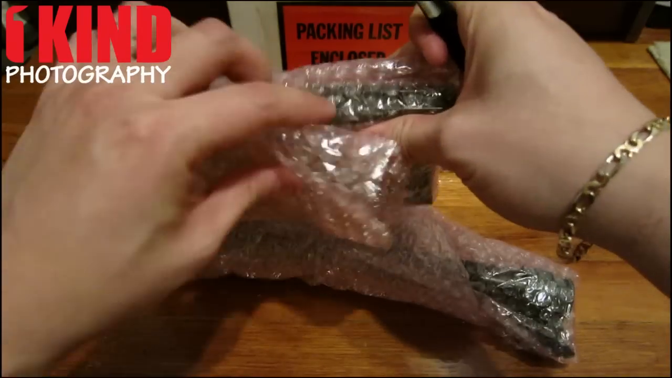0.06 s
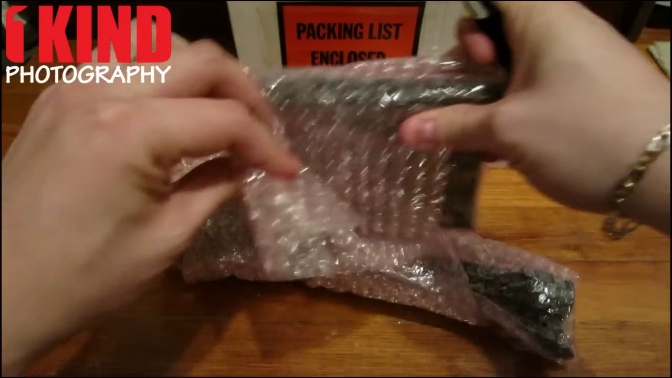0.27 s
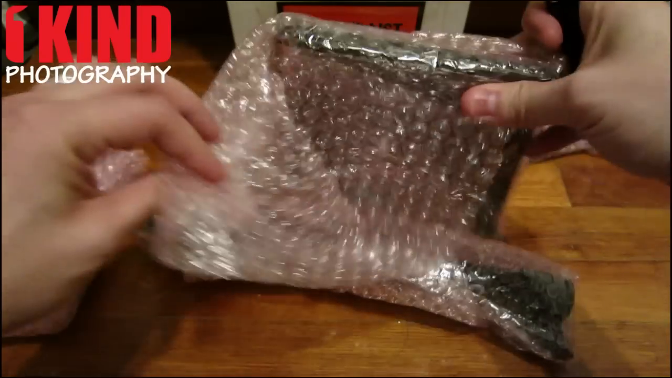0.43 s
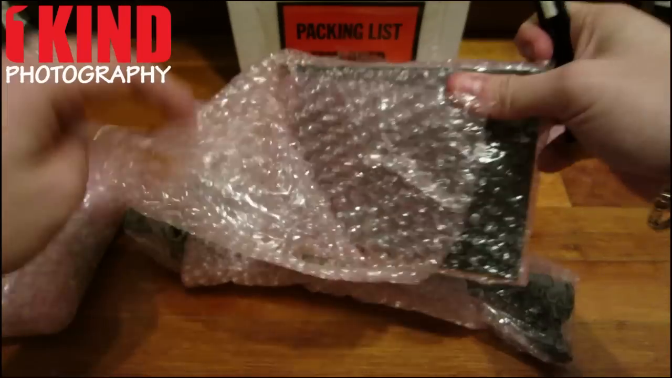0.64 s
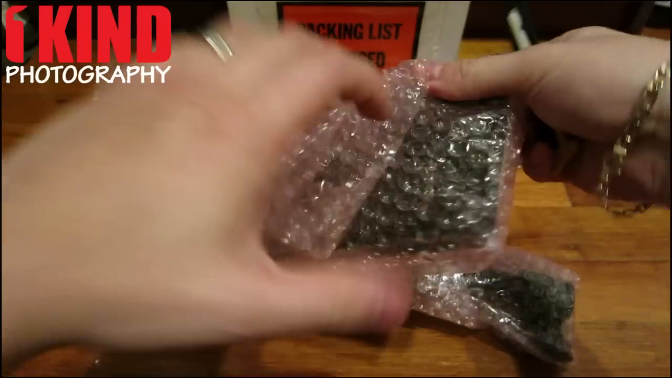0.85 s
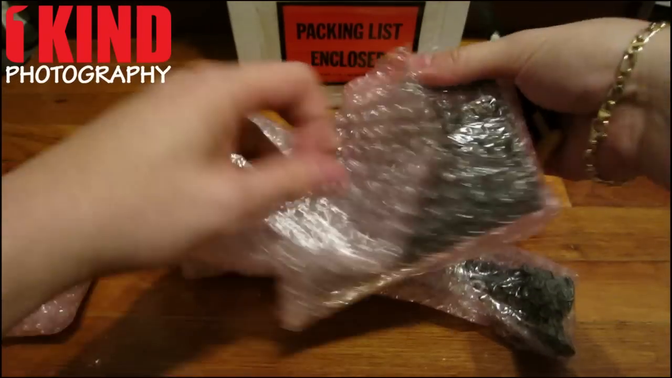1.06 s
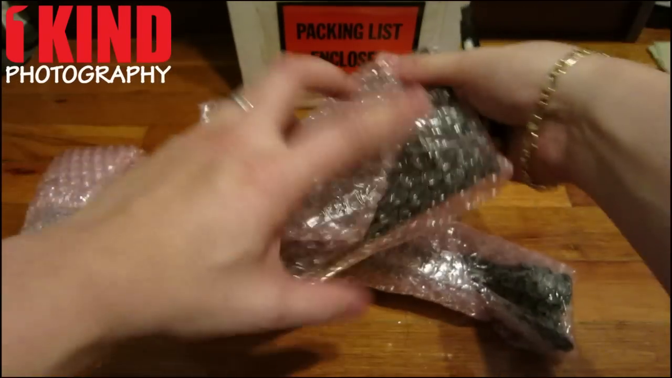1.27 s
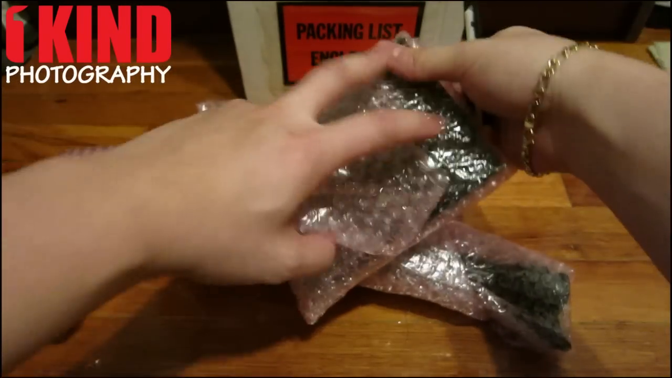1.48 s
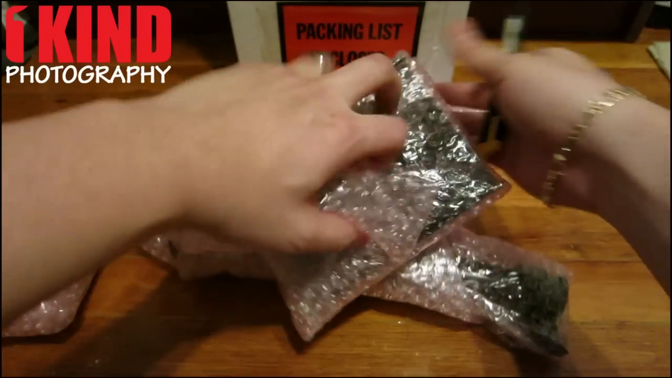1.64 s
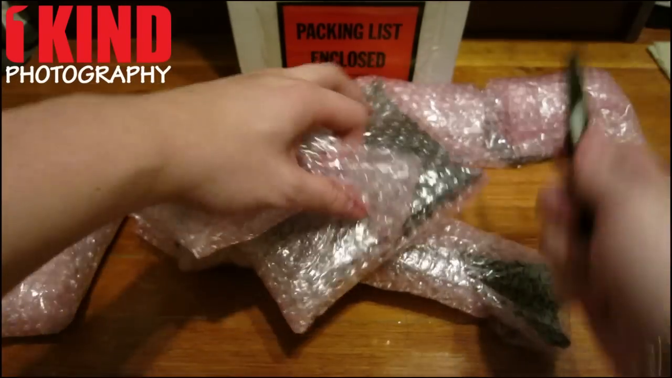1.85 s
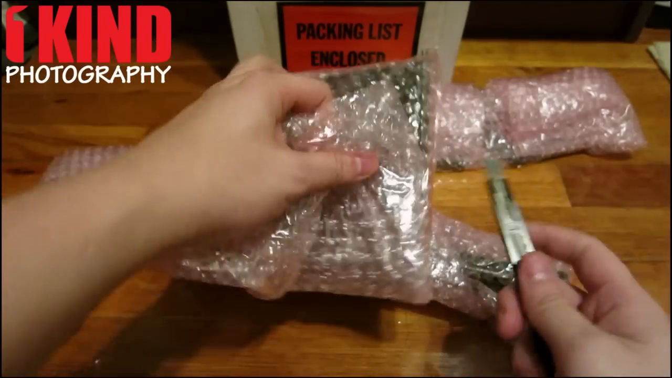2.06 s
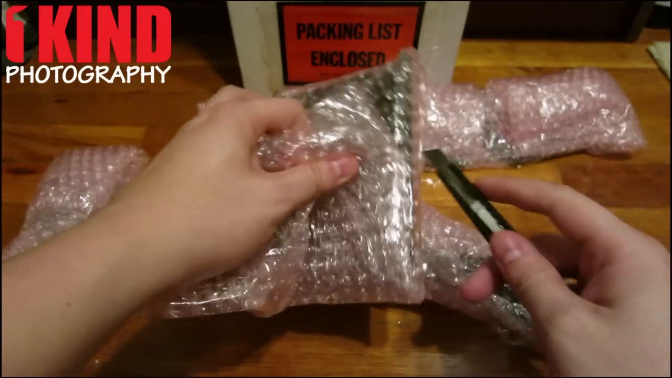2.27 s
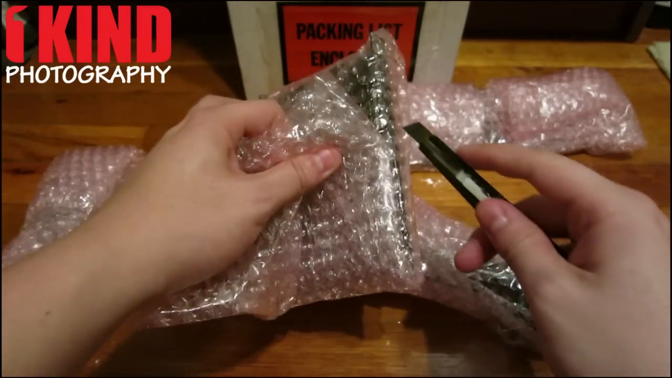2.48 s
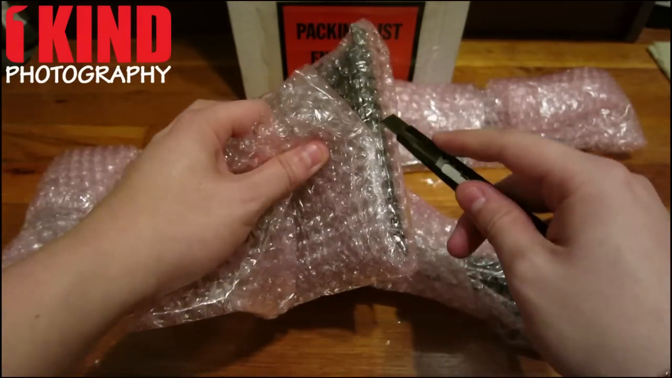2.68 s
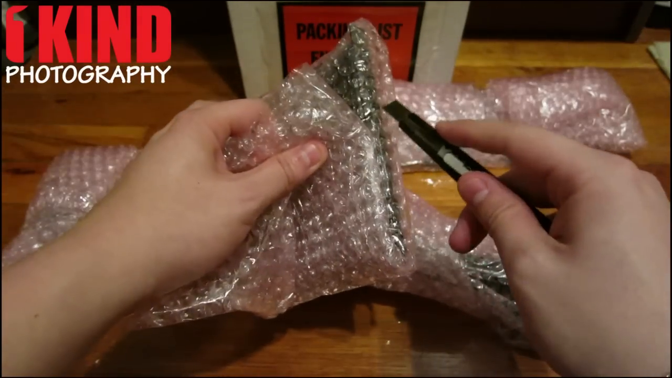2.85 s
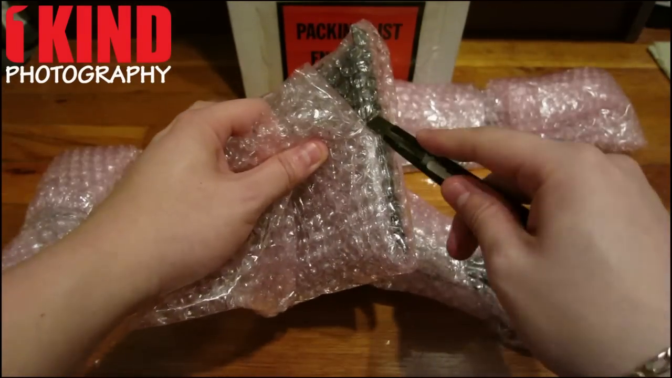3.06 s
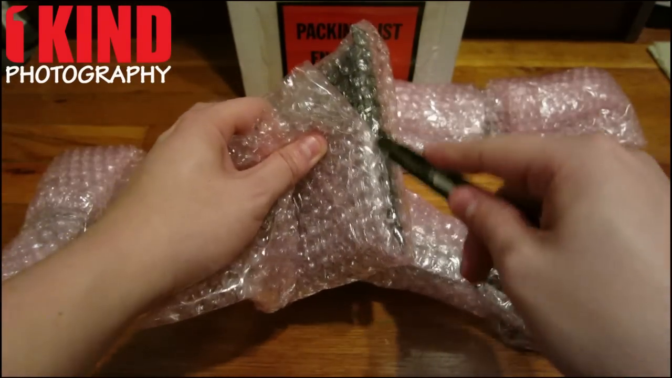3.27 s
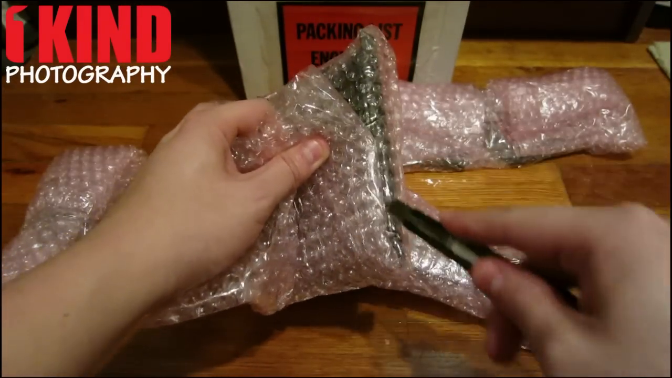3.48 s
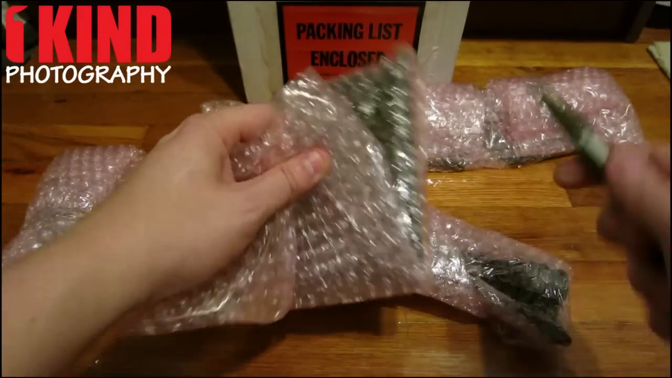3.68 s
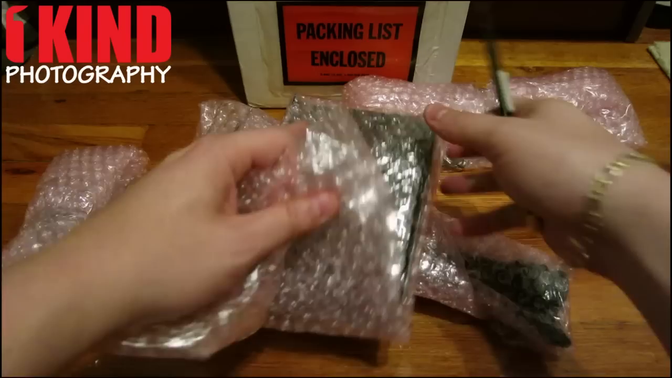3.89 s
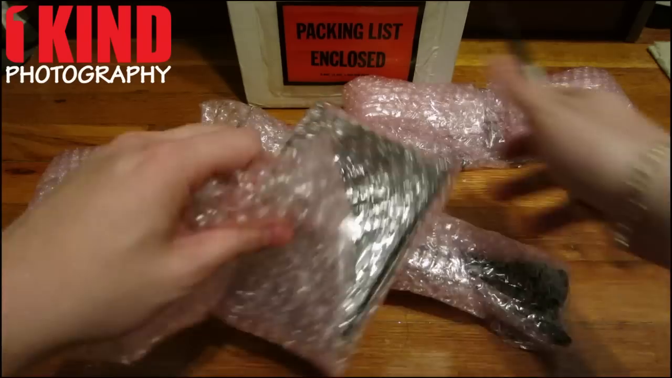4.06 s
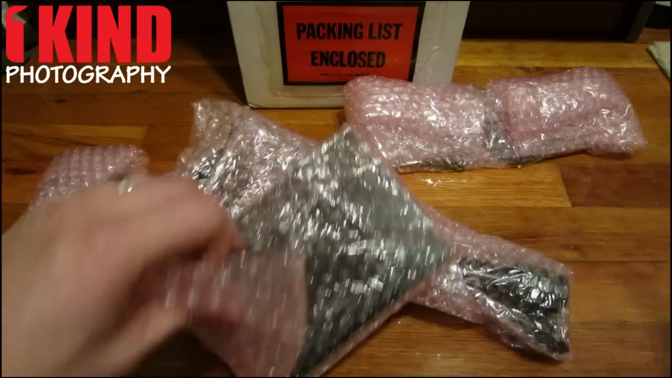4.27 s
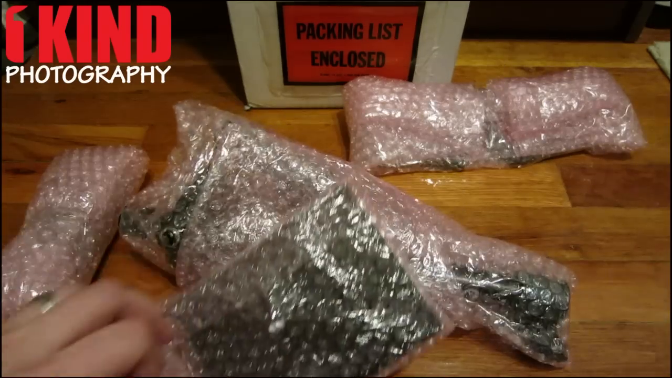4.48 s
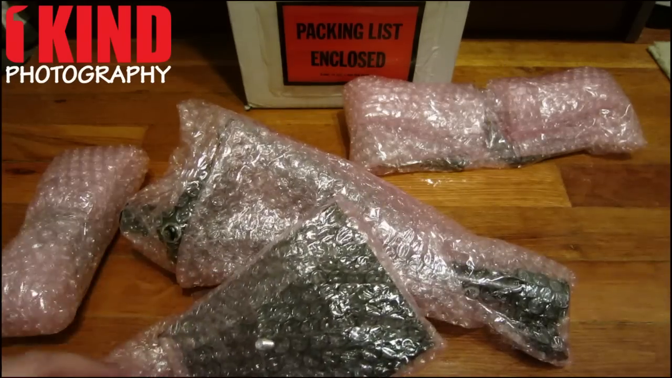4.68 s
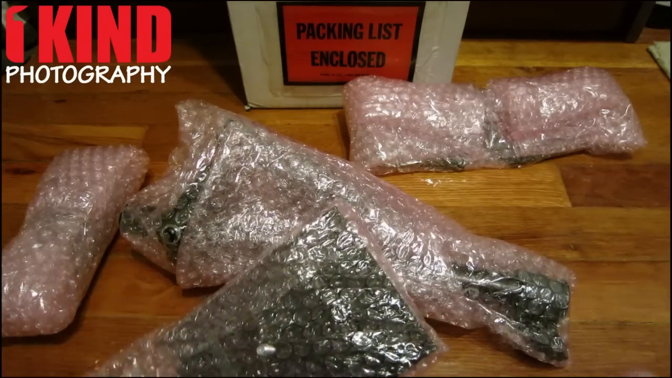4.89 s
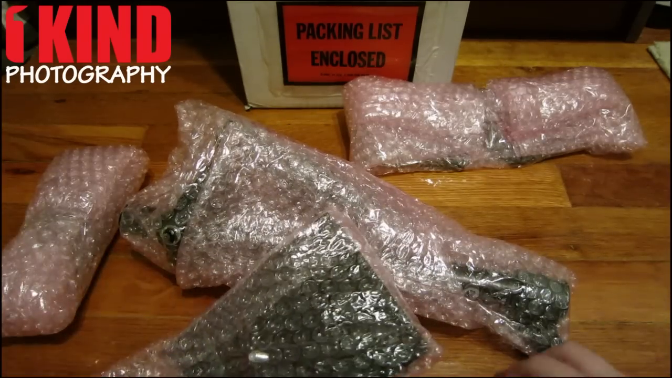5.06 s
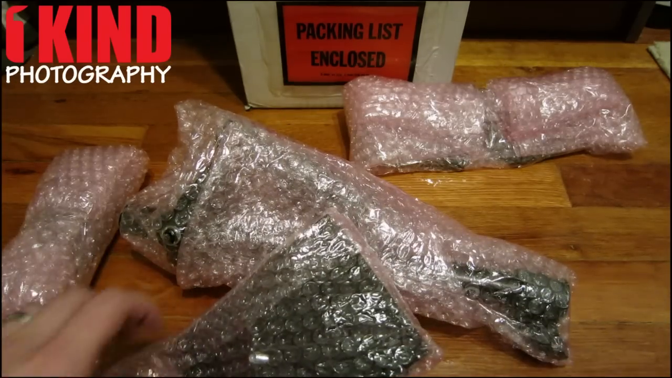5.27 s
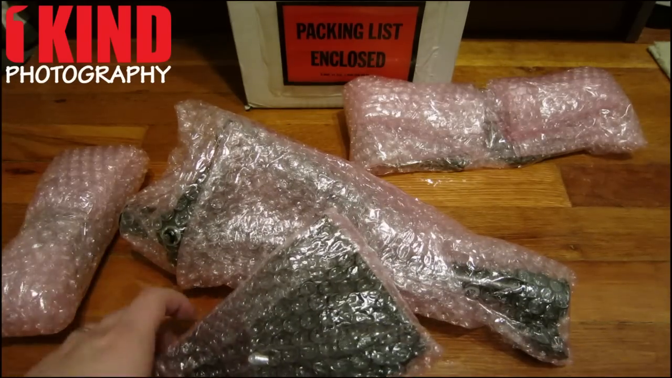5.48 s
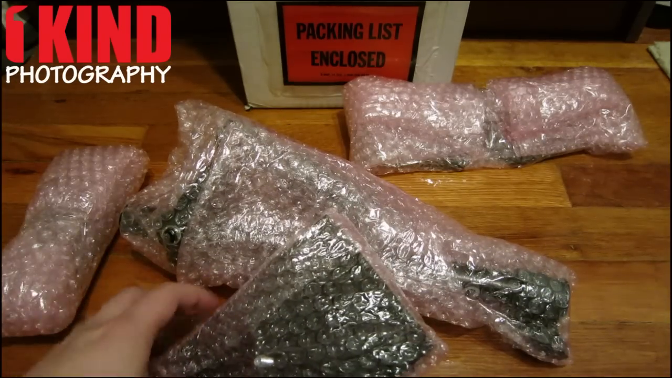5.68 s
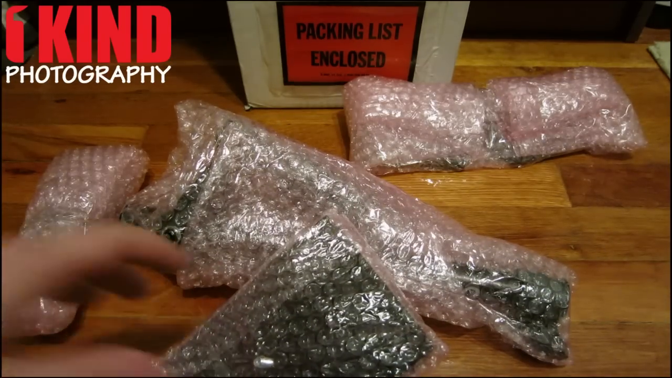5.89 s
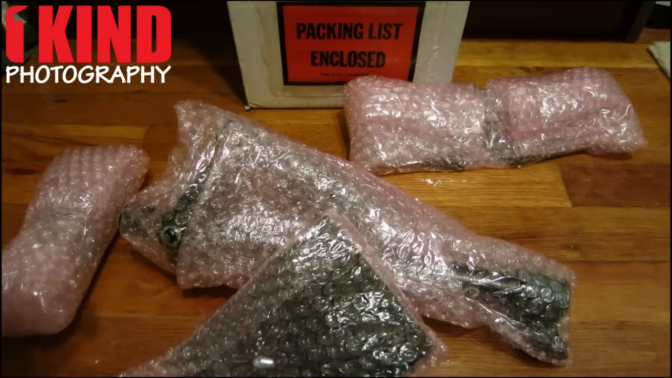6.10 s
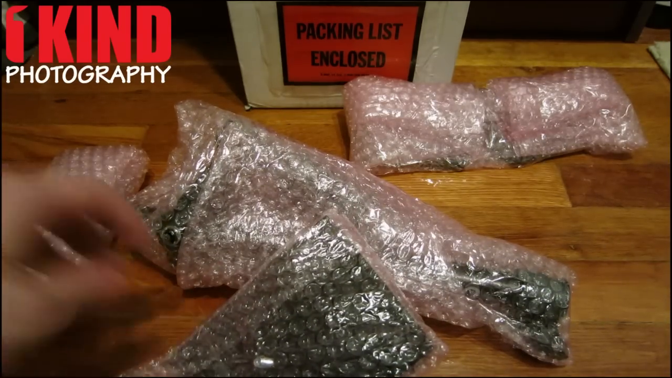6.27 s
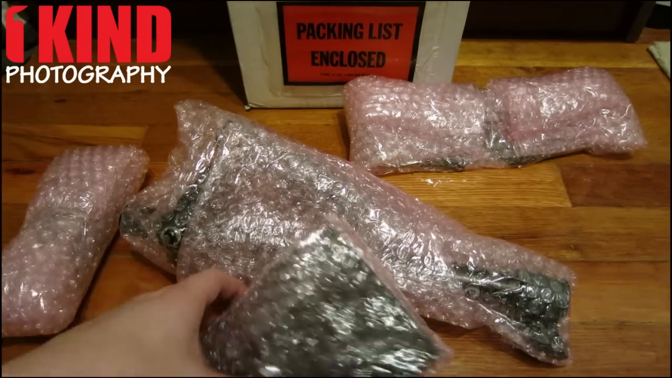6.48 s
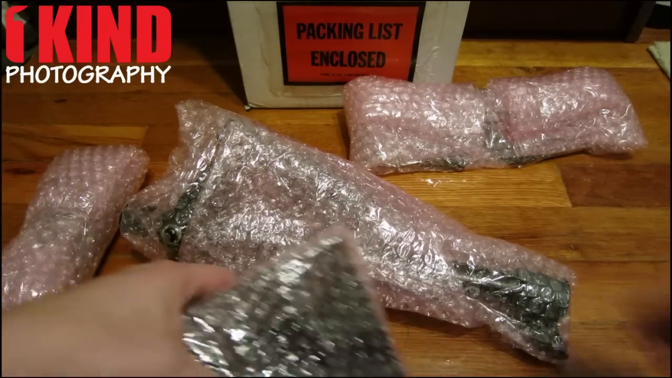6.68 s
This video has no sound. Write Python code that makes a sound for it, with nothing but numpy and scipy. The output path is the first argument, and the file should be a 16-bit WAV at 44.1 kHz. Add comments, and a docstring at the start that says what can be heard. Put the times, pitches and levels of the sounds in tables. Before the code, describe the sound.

A close, dry stereo scene in a quiet room with faint low hush and barely any echo. Bubble wrap crackles from the start, with a dense flurry of bright snaps until about 0.3 s, then softer rustling. From 0.9 to 2.2 s stronger crinkling swells come with dull padded thumps on wood and sharp pops near 1.6 s. From 2.4 to 3.4 s it is thinner and quieter, broken by single snaps, one loud at 2.8 s; another cluster pops around 3.5 s. Light rustling leads to a hard woody thud and crunch of wrap at 4.39 s. Seven quick, bright metallic ratchet clicks run from 4.5 to 4.6 s, then a knife is set down at 4.74 s, bouncing and rattling briefly. Sparse, gentle crinkles fade almost to stillness near 6 s, before a brisk rustle with two low thumps around 6.5 s.

```python
"""Hands unwrap parts from bubble wrap on a wooden table, close below a camera with two microphone ports.
From the start many tiny creases crackle over faint hush, and folds or strips of tape let go in snaps.
Parcels thump and rub the top, sounding its modes; at 4.39 s one lands hard and squashes its wrap.
At once a knife's slider ratchets shut, ringing blade and sheath; at 4.74 s the knife is laid down
and bounces. Lighter crackle and thumps carry on to the end; the room answers with sparse echoes."""
import sys
import numpy as np
from scipy import signal
from scipy.fft import rfft, irfft
from scipy.io import wavfile
from scipy.ndimage import uniform_filter1d

SR = 44100
rng = np.random.default_rng(int(sys.argv[2]) if len(sys.argv) > 2 else 0)


def inscribe(sig):
    """Save sig as 16-bit PCM at rate SR to the path in sys.argv[1].

    A 1-D sig is mono; a 2-D sig holds one channel per row.
    Samples are clipped to [-1, 1] before scaling.
    """
    pcm = np.round(np.clip(np.atleast_2d(sig).T, -1, 1) * 32767)
    wavfile.write(sys.argv[1], SR, pcm.astype(np.int16))


N = 297234

# colour of the crackle as heard at the ports, with the steep band limit above 14 kHz included:
# (frequency [Hz], level per hertz [dB])
HEARD_CRACKLE = [(240, -25.5), (400, -9), (920, -3), (2300, -3), (3000, 0), (5500, 0.33), (9200, -0.5),
                 (12800, -4.5), (14200, -11), (15300, -26), (15550, -22), (15900, -50.5)]
# large snaps: (time [s], peak level of the top [dB], strongest frequency [Hz],
#               body below 2 kHz relative level [dB])
LARGE_SNAPS = [(0.0445, -19, 5000, -22), (.049, -13.5, 3640, -28), (0.066, -17, 7100, -34),
               (.093, -19.5, 6640, -39), (0.1597, -7, 7300, -22.5), (0.163, -7.5, 4730, -17.5),
               (0.173, -4.5, 12000, -39), (0.1754, -14, 3900, -25), (.1785, -9, 3900, -26),
               (.186, -6.5, 7300, -30), (0.1973, -7.5, 8800, -37), (.206, -12, 7860, -35),
               (0.216, -8.5, 7240, -19.5), (0.226, -4.5, 7450, -20), (0.24, -11, 7680, -19),
               (0.2537, -8.5, 9100, -27), (0.2708, -8, 5700, -19), (0.2773, -5, 7350, -23),
               (.281, -6.5, 7300, -13.5), (0.284, -1.5, 2770, -18.5), (0.2927, -4.5, 6700, -29),
               (.2962, -7, 6500, -17), (.2988, -6.5, 3980, -11.5), (.5011, -21, 7200, -15),
               (.712, -25, 7900, -31), (0.7962, -21, 2800, -25), (.9006, -22.5, 9000, -29),
               (0.956, -14.5, 3200, -32), (1.0197, -19, 9600, -28), (1.0447, -19, 7660, -37),
               (1.317, -22, 4700, -5), (1.37, -17, 7500, -24), (1.3942, -14, 7100, -20),
               (1.4227, -11, 7700, -26), (1.6155, -7.5, 8650, -41), (1.6637, -10, 3730, -15),
               (2.1525, -17, 2750, -21), (2.4101, -23.5, 3660, -15), (2.5317, -30.5, 4500, -16),
               (2.573, -20.5, 8250, -32), (2.59, -19.5, 5300, -17), (2.6087, -16, 7200, -21.5),
               (2.649, -21, 3900, -18), (2.7132, -19, 4700, -26), (2.72, -16, 9100, -31),
               (2.783, -28.5, 4020, -15), (2.824, -12, 7700, -39), (2.8298, -4, 8200, -25),
               (2.976, -30, 4040, -26), (3.0305, -24, 7100, -14.5), (3.0512, -22.5, 7400, -26),
               (3.1166, -22.5, 7460, -38), (3.2395, -16, 8000, -27), (3.286, -10.5, 7650, -27),
               (3.2896, -9, 2670, -35), (3.3442, -19.5, 4250, -18), (3.397, -21, 1980, -16),
               (3.4162, -17, 1980, -14), (3.4653, -10.5, 2290, -13), (3.5097, -18.5, 7500, -18),
               (3.528, -19, 2300, -24), (3.5464, -13.5, 7500, -24), (3.5588, -4, 8700, -22),
               (3.5639, -9.5, 1900, -6.5), (3.602, -21.5, 8900, -20), (3.767, -23.5, 7700, -12.5),
               (4.203, -24.5, 9100, -34), (4.3547, -17.5, 5500, -42), (4.365, -43, 9000, -12),
               (5.026, -31.5, 6440, -15), (5.069, -28.5, 3840, -13), (5.113, -29, 10200, -28),
               (5.199, -34, 10700, -30), (5.2212, -33, 4040, -33), (5.7488, -36, 10600, -19)]
# where the hands work: (time [s], lead of the left port [microseconds])
HANDS_LEAD = [(0, 9), (.8, 2.8), (1.5, 0.76), (2.0, 4), (3.0, 2), (4.0, 3.2), (4.4, 6.9), (5.5, 9.3),
              (6.74, 3.2)]
PLACE_SPREAD_US = 4.2  # microseconds of lead across the sheet
LEAD_IN_S = 0.002  # silence ahead of each burst


def gain_of(db):
    """Amplitude factor of a level."""
    return 10 ** (np.asarray(db) / 20)


def evened(x):
    """Scales to rms 1."""
    return x / np.sqrt(np.mean(x ** 2) + 1e-20)


def read(points, hz):
    """Value of a spectrum table on a log-frequency axis."""
    f, value = np.transpose(points)
    return np.interp(np.log(hz + 1), np.log(f + 1), value)


def at_time(points, s):
    """Value of a two-column table, on straight lines between its rows."""
    return np.interp(s, *np.transpose(points))


def colour(x, db_of):
    """Filters by a level that depends on frequency."""
    size = x.shape[-1]
    return irfft(rfft(x) * gain_of(db_of(np.fft.rfftfreq(size, 1 / SR))), size)


def band(x, lo_hz, hi_hz):
    """Steep band-pass."""
    return signal.sosfilt(signal.butter(4, [lo_hz, hi_hz], "band", fs=SR, output="sos"), x)


def add(mix, s, sound):
    """Mixes a sound in at a time."""
    part = mix[..., round(s * SR):][..., :sound.shape[-1]]
    part += sound[..., :part.shape[-1]]


def ring(modes, t):
    """Sum of dying sines, each struck with its own strength."""
    return sum(gain_of(db - 60 * t / t60) * np.sin(2 * np.pi * hz * t) for hz, db, t60 in modes)


def ports(x, lead_us):
    """A sound reaches the two microphone ports a few microseconds apart; positive lead is left first."""
    size = x.shape[-1]
    # each port takes half of the lead, as a phase turn
    turn = np.exp(1j * np.pi * np.fft.rfftfreq(size, 1 / SR) * lead_us / 1e6)
    return irfft(rfft(x) * np.array([turn, 1 / turn]), size)


def burst(t60, noise, tick=5.4):
    """A sharp tick and a dying puff of noise, after a short lead-in."""
    t = np.arange(len(noise)) / SR - LEAD_IN_S
    puff = noise * gain_of(-60 * t / max(t60, .003)) * (t >= 0)
    return puff + tick * (np.arange(len(noise)) == np.argmax(t >= 0))


def body_of(x, body_db, lo_hz, hi_hz):
    """The low part of a burst, at peak level body_db."""
    low = band(x, lo_hz, hi_hz)
    return gain_of(body_db) * low / abs(low).max()


def hush():
    """Steady air of the room and hiss of the microphones: noise partly alike at the two ports."""
    # hush as heard at the end of the microphone chain, which rolls off its top:
    # (frequency [Hz], level per hertz [dB])
    heard_hush = [(18, -48), (30, -20), (43, -11), (70, -2), (189, -1.5), (304, -4), (356, -6.5),
                  (706, -10), (919, -7.5), (2370, -20.5), (12800, -32), (16200, -45)]
    # likeness of left and right: (frequency [Hz], correlation [-1 to 1])
    likeness = [(60, -0.4), (240, -0.57), (950, -0.51), (3770, 0.44), (15000, -0.49)]
    hz = np.fft.rfftfreq(N, 1 / SR)
    left, other = rfft(rng.standard_normal((2, N)))
    same = np.clip(read(likeness, hz), -1, 1)
    right = same * left + np.sqrt(1 - same ** 2) * other
    spectra = np.array([left, right]) * gain_of(read(heard_hush, hz))
    return gain_of(-58.5) * evened(irfft(spectra, N))


def swell(s, held, db, rise, sag, fall):
    """Power of a gesture every 44 samples: a quick rise, a slow sag while held, then a fall (dB/s)."""
    t = np.arange(N // 44 + 2) * 44 / SR - s
    rising, holding = rise * np.minimum(t, 0), sag * np.clip(t, 0, held)
    falling = fall * np.maximum(t - held, 0)
    return gain_of(db + rising - holding - falling) ** 2


def handling():
    """Amplitude of crackle and body: moves of the hands and the stir round large snaps add in power."""
    # moves of the hands: (time at full strength [s], held [s], crackle level [dB],
    #                      body below 2 kHz relative level [dB])
    moves = [(0.0, 0.17, -40, -12), (.17, 0.017, -32.5, -20), (0.282, 0.007, -35, -8.5),
             (.33, 0.34, -39, -15.5), (.66, .08, -46.5, -14), (0.783, 0.0067, -39, -19),
             (0.958, 0.17, -32, -16.5), (1.178, .08, -37.5, -11), (1.315, 0.025, -31.5, -13),
             (1.369, 0.033, -29, -14), (1.462, 0.097, -37, -14.5), (1.617, 0.09, -29.5, -14),
             (1.739, 0.25, -33.5, -13.5), (1.973, 0.0057, -32, -13), (2.05, 0.13, -35, -14),
             (2.25, 0.083, -44, -12.5), (2.408, 0.073, -47, -8), (2.48, 0.038, -56.5, 0),
             (2.58, 0.11, -45.5, -13.5), (2.91, 0.044, -57.5, -5), (3.03, 0.23, -47.5, -11),
             (3.208, 0.026, -41.5, -13.5), (3.27, 0.0086, -40, -14), (3.4, .015, -46.5, -11),
             (3.6, 0.16, -45.5, -12), (3.748, 0.094, -42, -14), (3.9, 0.086, -46.5, -13),
             (4.002, 0.32, -43, -11.5), (4.36, .12, -41, -12.5), (4.751, 0.058, -47.5, -18.5),
             (4.85, 0.11, -42.5, -12.5), (5.07, 0.046, -48.5, -14), (5.472, 0.077, -44.5, -10.5),
             (5.56, 0.046, -49.5, -6), (5.65, .04, -56.5, -12), (5.71, 0.046, -55, -9.5),
             (6.073, 0.0084, -54.5, -9.5), (6.18, 0.16, -62.5, -4), (6.464, 0.011, -47, -5),
             (6.502, 0.096, -31.5, -9.5), (6.64, 0.086, -40, -10.5)]
    rise, sag, settle = 470, 15, 246  # dB/s
    power = [np.outer([1, gain_of(body_db) ** 2], swell(s, held, db, rise, sag, settle))
             for s, held, db, body_db in moves]
    # around each large snap the neighbouring folds crackle too
    stir_db, stir_body_db = -32, -10.5  # relative to the snap, to the stir
    stir_rise, stir_fall = 899, 339  # dB/s
    power += [np.outer([1, gain_of(stir_body_db) ** 2], swell(s, 0, db + stir_db, stir_rise, 0, stir_fall))
              for s, db, _, _ in LARGE_SNAPS]
    # the film never lies quite still
    rest_db, rest_body_db = -65.5, -15  # body relative to the rest crackle
    level = np.sqrt(sum(power) + gain_of([[rest_db], [rest_db + rest_body_db]]) ** 2)
    return np.array([np.interp(np.arange(N) / 44, np.arange(len(v)), v) for v in level])


def creases(per_s=7000, spread_db=2.0, clump_db=2.15, patch_db=4.0, count=30):
    """Tiny folds all over the sheet buckle in clumps; each gives a few cycles at its own pitch."""
    clumps = evened(uniform_filter1d(uniform_filter1d(rng.standard_normal(N), size=250), size=250))
    sizes = gain_of(spread_db * np.minimum(rng.exponential(1, N), 6) + clump_db * clumps)
    sizes *= (rng.random(N) < per_s / SR) * rng.choice([-1., 1.], N)
    kind = rng.integers(0, count, N)
    # the balance of pitches drifts: neighbouring ones swell and fade together
    patches = rng.standard_normal((count, N // 256 + 1))
    patches = evened(uniform_filter1d(uniform_filter1d(patches, size=4, axis=0), size=7, axis=1))
    sizes *= gain_of(patch_db * patches[kind, np.arange(N) // 256])
    t, out = np.arange(512) / SR, np.zeros((3, N))
    for k, hz in enumerate(np.geomspace(500, 15000, count)):
        grain = np.sin(2 * np.pi * hz * t + 1) * np.exp(-t * hz / 1.38)
        # equal power per hertz: wide high grains carry more energy
        grain = grain / np.linalg.norm(grain) * np.sqrt(hz)
        # the pitches are dealt in turn to three places on the sheet
        out[k % 3] += signal.oaconvolve(sizes * (kind == k), grain)[:N]
    return out


def crackle(level):
    """Creases over a softer sliding hiss from left, middle and right of the sheet, shaped as heard."""
    parts = evened(creases()) + gain_of(-5.0) * rng.standard_normal((3, N))
    film = sum(ports(part, side * PLACE_SPREAD_US) for side, part in zip((-1, 0, 1), parts))
    # a small shift in time is the slope of the wave times the shift
    lead_s = at_time(HANDS_LEAD, np.arange(N) / SR) / 1e6
    film = film + np.array([[.5], [-.5]]) * lead_s * SR * np.gradient(film, axis=1)
    film = colour(film, lambda hz: read(HEARD_CRACKLE, hz))
    sheen, body = evened(band(film, 2000, 17000)), evened(band(film, 450, 2000))
    # a parcel squashes its wrap on the table
    landing_s, landing_db, squash_s, t60 = 4.3868, -17.5, 0.022, 0.064
    t = np.arange(N) / SR - landing_s
    landing = gain_of(landing_db - 60 * np.maximum(t - squash_s, 0) / t60) * (t >= 0)
    crunch = band(sheen, 2320, 10200) + gain_of(-5.5) * (sheen + body)
    return level[0] * sheen + level[1] * body + landing * crunch


def small_snaps(level):
    """Rows like the large snaps, drawn by chance, mostly well above the crackle of the moment."""
    count, over_db, spread_db = 70, 13.5, 1.5
    centre_hz, spread_octaves, body_db = 5420, 0.61, -24
    at, chance = rng.random(count), rng.standard_normal((count, 3))
    db = 20 * np.log10(level[(at * N).astype(int)]) + over_db + spread_db * chance[:, 0]
    hz = centre_hz * 2 ** (spread_octaves * chance[:, 1])
    return list(zip(at * N / SR, db, hz, body_db + 6 * chance[:, 2]))


def snaps(level):
    """A large fold or a strip of tape lets go at once, loudest around one pitch; some pockets ring."""
    # a pocket of film rings: (time [s], level of its lower partial [dB], frequency [Hz], t60 [s])
    pockets = [(.022, -21.5, 1300, 0.01), (1.49, -32, 1140, 0.025), (1.979, -19, 2890, 0.025),
               (2.714, -26.5, 1380, 0.013), (2.827, -27.5, 1490, 0.016), (3.056, -38.5, 1120, 0.042),
               (3.468, -18.5, 1620, 0.011), (3.91, -32.5, 2850, .03)]
    typical_t60, t60_spread = 0.011, 0.31  # s, spread of its natural logarithm
    rows = LARGE_SNAPS + small_snaps(level)
    out, chance = np.zeros((2, N)), rng.standard_normal((len(rows), 2050))
    for (s, db, loudest_hz, body_db), (place, damp, *noise) in zip(rows, chance):
        x = burst(typical_t60 * np.exp(t60_spread * damp), np.array(noise))

        def snap_colour(hz):
            """The heard crackle's spectrum with a 7 dB hump at the strongest frequency."""
            octaves = np.log2((hz + 1) / loudest_hz)
            return read(HEARD_CRACKLE, hz) + 7 * np.exp(-(octaves / 0.44) ** 2)

        top = band(colour(x, snap_colour), 2300, 21900)
        snap = gain_of(db) * (top / abs(top).max() + body_of(x, body_db, 745, 2070))
        lead_us = at_time(HANDS_LEAD, s) + place * PLACE_SPREAD_US
        add(out, max(s - LEAD_IN_S, 0), ports(snap, lead_us))
    t = np.arange(4096) / SR
    for s, db, hz, t60 in pockets:
        pocket = ring([(hz, db, t60), (1.3 * hz, db - 9.0, t60)], t)
        add(out, s, pocket * np.minimum(t / 0.00042, 1))
    return out


def table(level):
    """Padded parcels push the wooden top softly and ring its modes; dragging keeps it rumbling."""
    # thumps: (time [s], peak level [dB], frequency near which the top is moved most [Hz],
    #          deep push relative level [dB])
    thumps = [(0.157, -46, 262, -30), (0.29, -45, 270, -34), (0.95, -44, 256, -32), (1.09, -35, 255, -19),
              (1.17, -44, 229, -17), (1.222, -41, 259, -30), (1.311, -35.5, 220, -12),
              (1.365, -37.5, 248, -13), (1.45, -45, 111, -2.5), (1.647, -35.5, 178, -15),
              (2.081, -41, 270, -24), (2.407, -32.5, 244, -12), (3.558, -41, 520, -36),
              (4.386, -14, 214, -56), (4.745, -45, 396, -40), (4.766, -42, 392, -37),
              (4.775, -39, 265, -38), (4.811, -40, 272, -41), (4.859, -47, 263, -34),
              (4.949, -46, 263, -33), (5.05, -47, 157, -25), (5.57, -49.5, 248, -30),
              (6.518, -26.5, 230, -38), (6.585, -30.5, 217, -20)]
    # modes of the free top: (frequency [Hz], level [dB], t60 [s])
    top_modes = [(120, -9, 0.25), (159.4, 0, 0.21), (233, 2.5, 0.12), (262.7, 1, 0.18), (342.5, -7.5, 0.16),
                 (392, -7, 0.13), (698, 3.5, 0.047), (1060, 3, .07)]
    # how firmly parcels rub the top: (time [s], rumble relative to the body of the crackle [dB])
    contact = [(0, -7), (.7, -11), (1.2, -6.5), (1.9, -10), (2.7, -2.5), (3.3, -14.5), (4.3, -11.5),
               (4.7, -10), (4.77, 6), (5.0, -5), (5.4, -11.5), (6.74, -10)]
    # light pushes come from parcels held against the top, which damp it:
    # (peak level [dB], share of the free ring time [fraction])
    damping = [(-46, 0.57), (-12, 1)]
    t, out = np.arange(12000) / SR, np.zeros(N)
    chance = rng.standard_normal((len(thumps), len(top_modes)))
    push = np.hanning(round(0.0014 * SR) + 3)
    for (s, db, moved_hz, deep_db), jitter_db in zip(thumps, chance):
        share, struck = at_time(damping, db), []
        for (hz, mode_db, t60), jitter in zip(top_modes, jitter_db):
            nearness = np.exp(-(np.log2(hz / moved_hz) / 0.13) ** 2)
            struck.append((hz, mode_db + jitter + 8 * nearness, t60 * share))
        # a free board cancels its own deepest bass; the legs give way once
        blow = band(np.convolve(push, ring(struck, t))[:len(t)], 148, 3000)
        legs = ring([(70, deep_db, 0.14)], t) * np.minimum(t / 0.0051, 1)
        add(out, s + 0.00099, -gain_of(db) * (blow / abs(blow).max() + legs))
    # for the drag the modes run six times faster: higher and shorter, then kept to the low band
    drag = signal.oaconvolve(rng.standard_normal(N), ring(top_modes, 6 * t))[:N]
    rumble = evened(band(drag, 127, 576))
    return out + level * gain_of(at_time(contact, np.arange(N) / SR)) * rumble


def knife_clicks():
    """Rows (s, peak dB, brightness dB per octave, body dB, lowest mode dB) for teeth and bounces."""
    # teeth of the slider: (time [s], peak level of the top [dB], body below 3.5 kHz relative level [dB])
    teeth = [(4.4789, -3, -33), (4.4986, -4, -43), (4.5275, -6, -28), (4.5464, -6.5, -23),
             (4.5655, -6, -34), (4.5831, -7, -42), (4.6021, -7, -40)]
    # the knife bounces on the table: (time [s], peak level of the top [dB], brightness [dB per octave])
    bounces = [(4.7449, -8.5, -17), (4.7621, -15, -20), (4.7664, -21, -12), (4.7723, -16, -9),
               (4.779, -15.5, -9), (4.811, -22, -26), (4.8281, -14.5, -12), (4.8513, -22, -21),
               (4.855, -21.5, -27.5)]
    # as the blade slides in, the clicks dull and the lowest mode grows, first tooth to last
    ends = teeth[0][0], teeth[-1][0]
    clicks = [(s, db, np.interp(s, ends, (17, 9)), body_db, np.interp(s, ends, (-3, 9.5)))
              for s, db, body_db in teeth]
    # duller bounces carry more body
    clicks += [(s, db, tilt, -27.5 - 0.66 * tilt, -7.5) for s, db, tilt in bounces]
    return clicks


def knife():
    """Each tooth of the slider, each bounce on the table rings the blade and its sheath."""
    # modes of blade and sheath, before chance shifts: (frequency [Hz], level [dB], t60 [s])
    blade_modes = [(4430, 13, 0.0044), (5030, 4, 0.0037), (6040, -1.5, 0.0049), (6700, -1.5, 0.007),
                   (7700, -1.5, .005), (8760, -5, 0.0046), (9680, -5.5, 0.0067), (10700, -9.5, 0.0055),
                   (11300, -14, 0.0032), (12940, -12, .004)]
    out, t, rows = np.zeros(N), np.arange(8192) / SR, knife_clicks()
    chance = rng.standard_normal((len(rows), len(blade_modes), 2))
    noises = rng.standard_normal((len(rows), 8192))
    for (s, db, tilt_db, body_db, lowest_db), shifts, noise in zip(rows, chance, noises):
        struck = []
        for (hz, mode_db, t60), (level_shift, pitch_shift) in zip(blade_modes, shifts):
            struck_db = mode_db + tilt_db * np.log2(hz / 6500) + 2 * level_shift
            struck.append((hz * (1 + 0.032 * pitch_shift), struck_db, t60))
        hz, struck_db, t60 = struck[0]
        struck[0] = (hz, struck_db + lowest_db, t60)
        # a short rattling contact excites the modes; a faint rattle follows
        onset = np.clip((t - LEAD_IN_S) / 0.00069 + 0.35, 0, 1)
        contact = burst(0.013, noise, tick=1.5) * onset
        x = contact + gain_of(-27.0) * burst(0.24, noise[::-1], tick=0)
        top = band(signal.oaconvolve(x, ring(struck, t[:1024]))[:len(t)], 4670, 13700)
        click = top / abs(top).max() + body_of(x, body_db, 300, 3500)
        add(out, s - LEAD_IN_S, gain_of(db) * click)
    return ports(out, -23)  # microseconds: the right port hears first


def room(x):
    """Sparse taps of random sign, each band dying at its own speed, other taps for each side."""
    # decay of the room: (frequency [Hz], t60 [s])
    decay = [(200, 0.46), (1500, 0.03), (6000, 0.03), (14000, 0.038)]
    taps = np.zeros((2, SR // 2))
    grid = np.arange(60, SR // 2 - 20, 20)
    at = grid + rng.integers(0, 20, (2, len(grid)))
    np.put_along_axis(taps, at, rng.choice([-1., 1.], at.shape), axis=1)
    hz, t, z = signal.stft(taps, SR, nperseg=256)
    dying = z * gain_of(-60 * t / read(decay, hz)[:, None])
    tail = signal.istft(dying, SR, nperseg=256)[1]
    return signal.fftconvolve(x, tail / np.linalg.norm(tail[0]), axes=1)[:, :N]


def scene():
    """Everything sounds close; the room answers faintly."""
    level = handling()
    near = crackle(level) + snaps(level[0]) + table(level[1]) + knife()
    return near + gain_of(-31) * room(near) + hush()


def record(dry):
    """Scattered treble reaches the ports with opposite sign; port balance and a band limit follow."""
    # echoes off the camera body: (frequency [Hz], level [dB])
    scatter = [(2500, -42), (5000, -18), (8000, -10), (12000, -4)]
    # balance of the ports: (frequency [Hz], left minus right [dB])
    balance = [(4400, -0.03), (7000, 0.5), (9500, 2), (14000, 1.5)]
    t = np.arange(-8, 504) / SR
    echoes = rng.standard_normal(512) * gain_of(-60 * t / .01) * (np.arange(512) > 8)
    scattered = signal.oaconvolve(dry.mean(axis=0), echoes / np.linalg.norm(echoes))[:N]
    heard = dry + np.array([[1], [-1]]) * colour(scattered, lambda hz: read(scatter, hz))
    heard = colour(heard, lambda hz: np.array([[.5], [-.5]]) * read(balance, hz))
    low_pass = signal.firwin(511, 16300, window=("kaiser", 9), fs=SR)  # cutoff in Hz
    return signal.oaconvolve(heard, low_pass[None], "same", axes=1)


dry = scene()
out = record(dry)
inscribe(out)
```